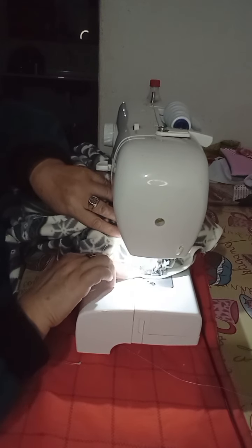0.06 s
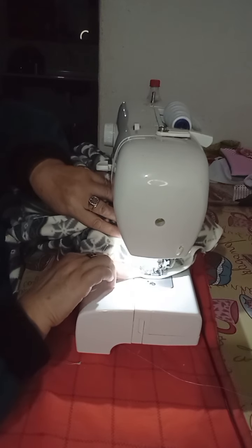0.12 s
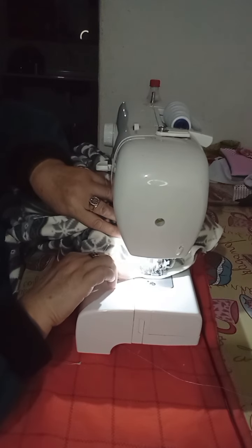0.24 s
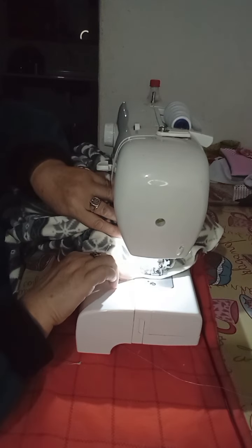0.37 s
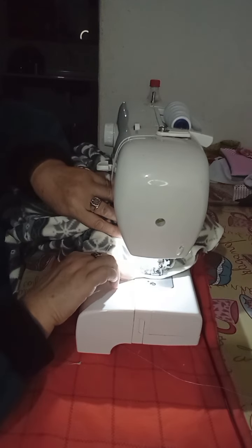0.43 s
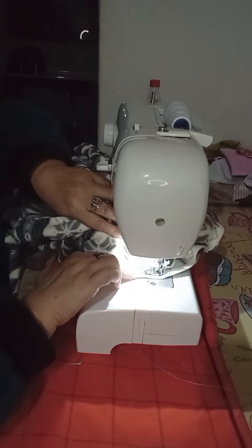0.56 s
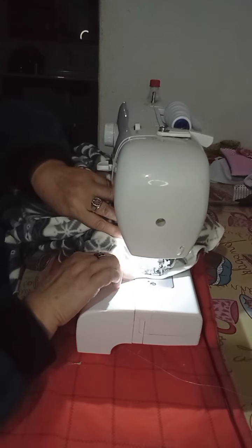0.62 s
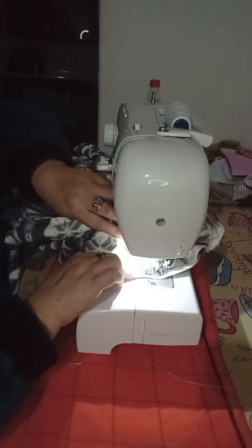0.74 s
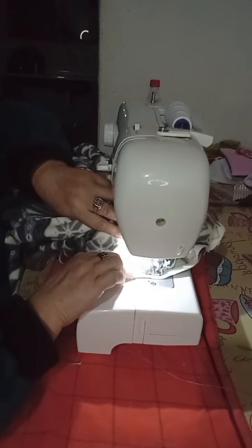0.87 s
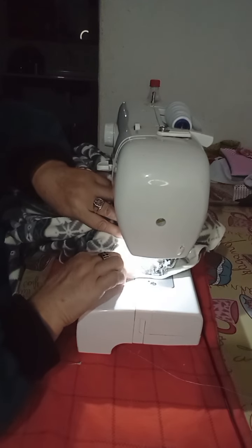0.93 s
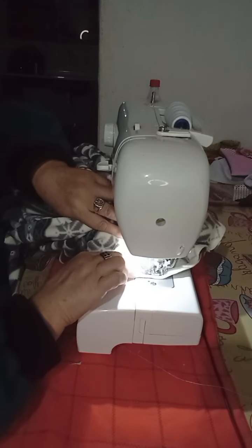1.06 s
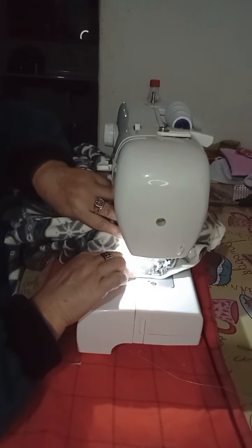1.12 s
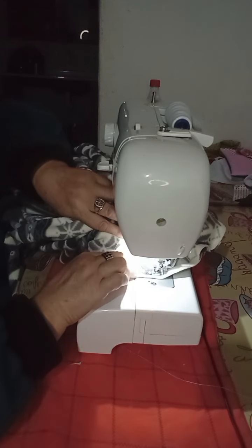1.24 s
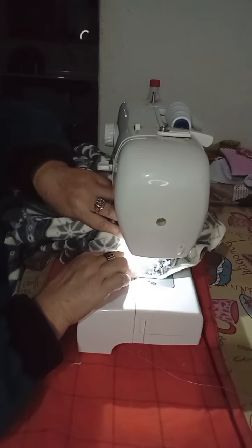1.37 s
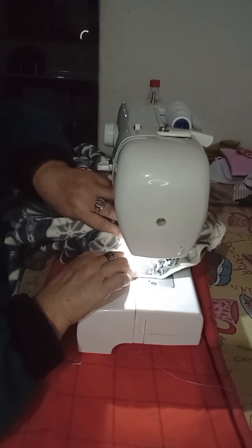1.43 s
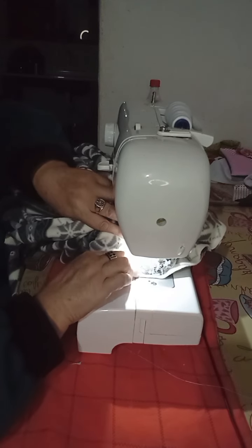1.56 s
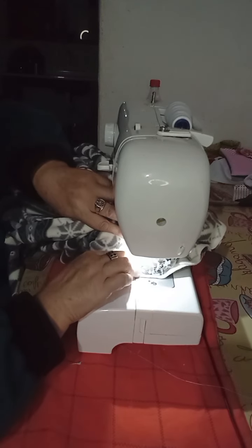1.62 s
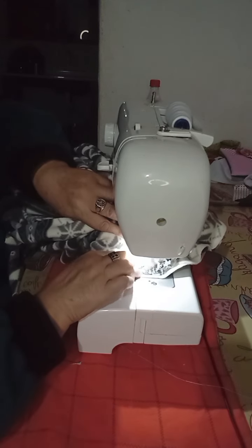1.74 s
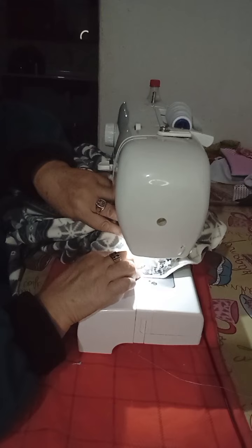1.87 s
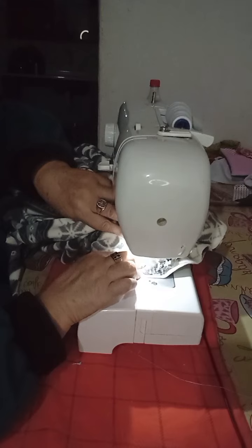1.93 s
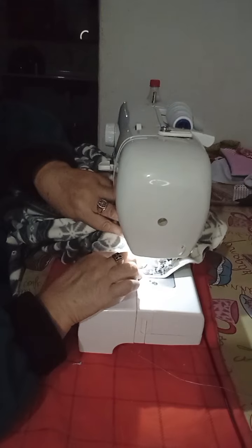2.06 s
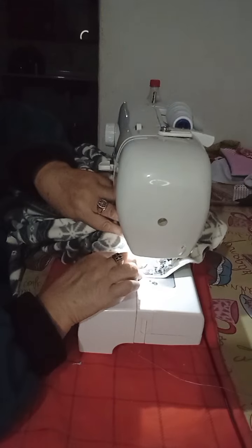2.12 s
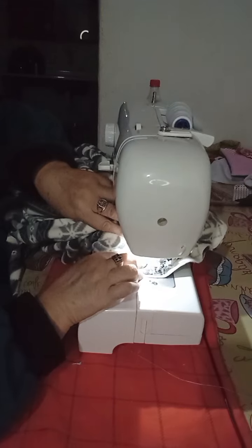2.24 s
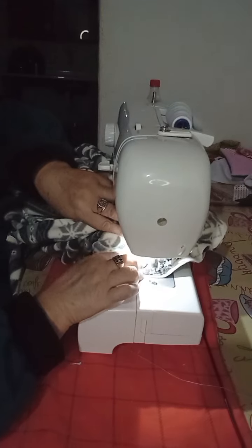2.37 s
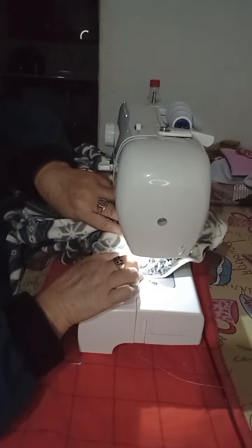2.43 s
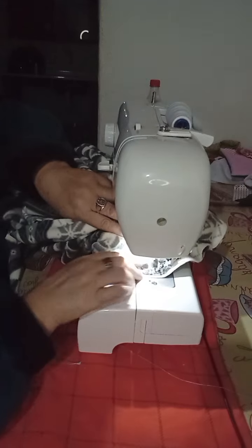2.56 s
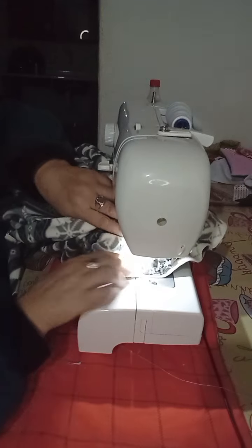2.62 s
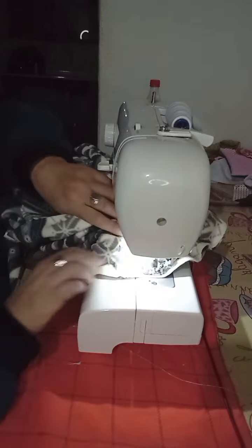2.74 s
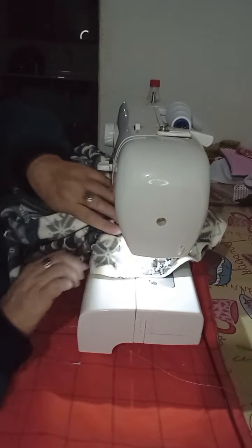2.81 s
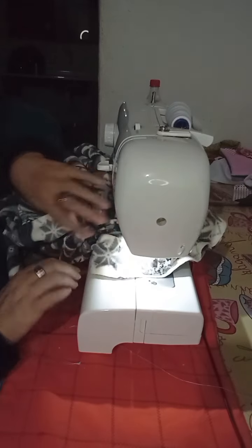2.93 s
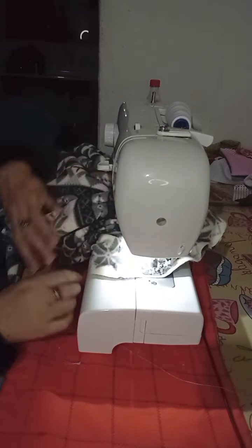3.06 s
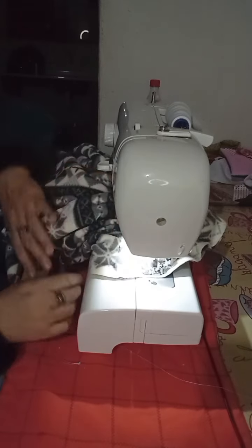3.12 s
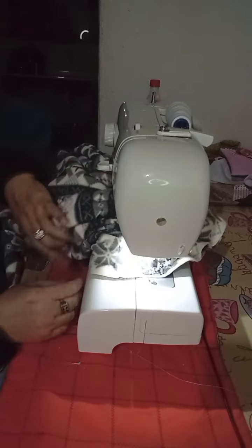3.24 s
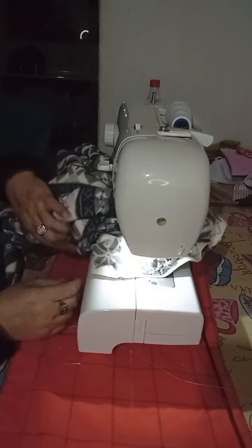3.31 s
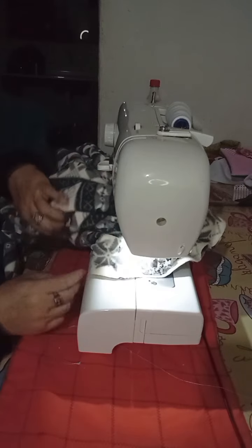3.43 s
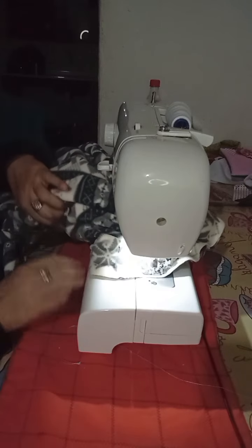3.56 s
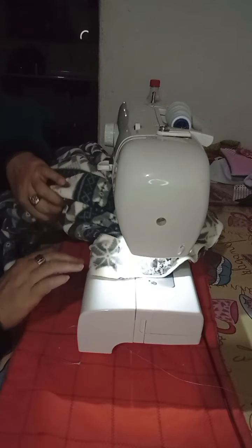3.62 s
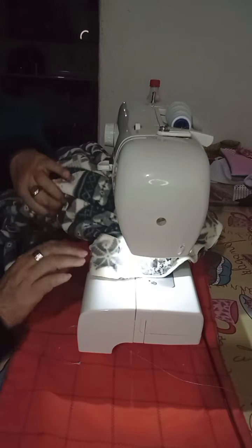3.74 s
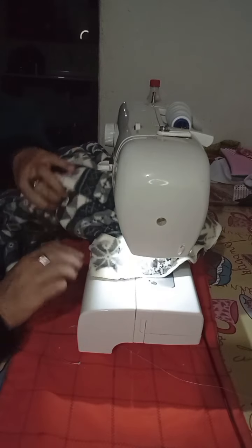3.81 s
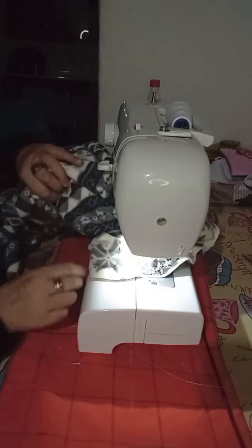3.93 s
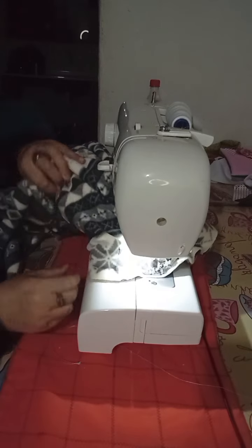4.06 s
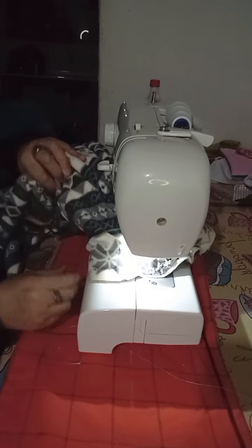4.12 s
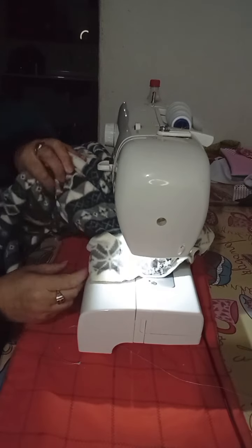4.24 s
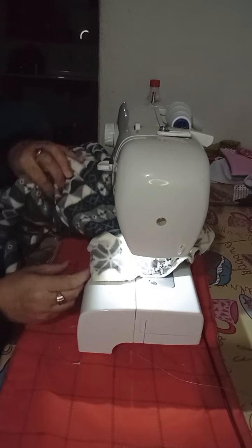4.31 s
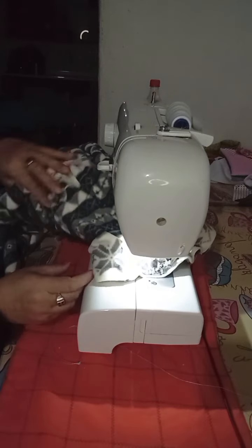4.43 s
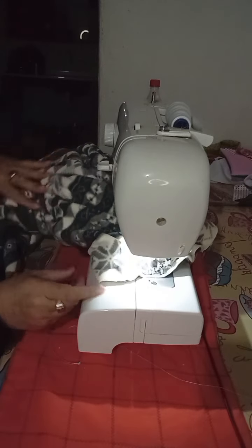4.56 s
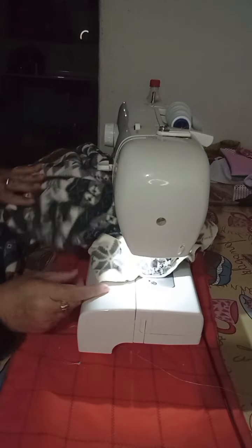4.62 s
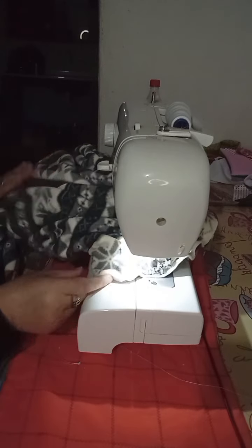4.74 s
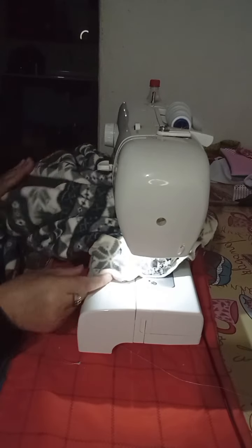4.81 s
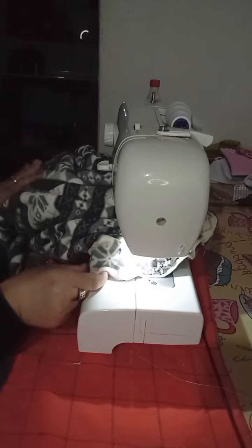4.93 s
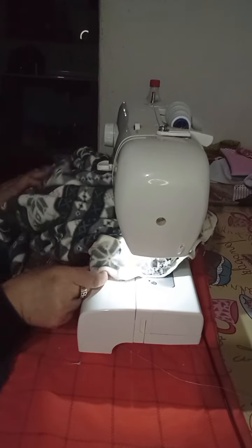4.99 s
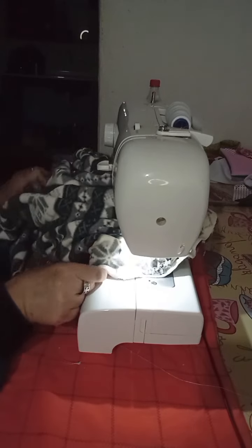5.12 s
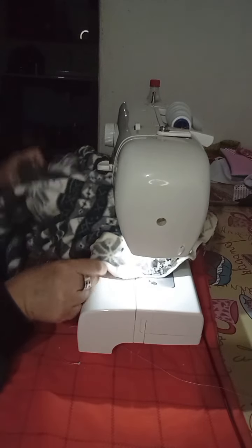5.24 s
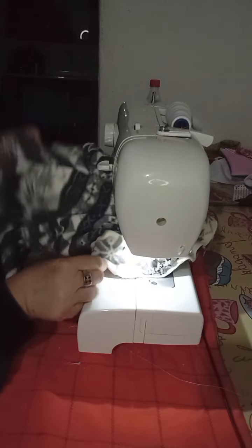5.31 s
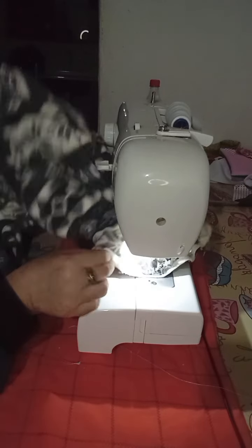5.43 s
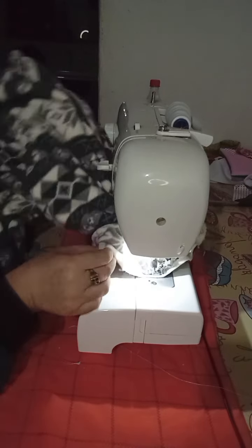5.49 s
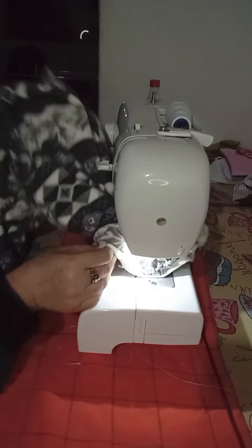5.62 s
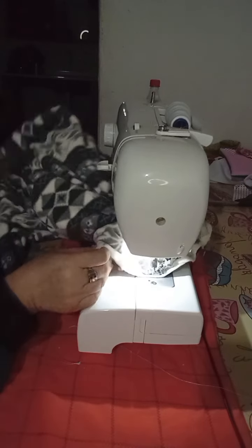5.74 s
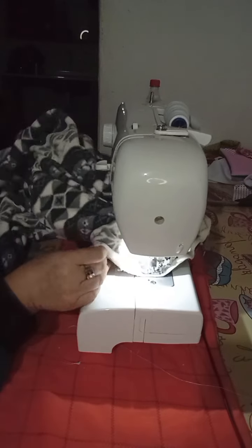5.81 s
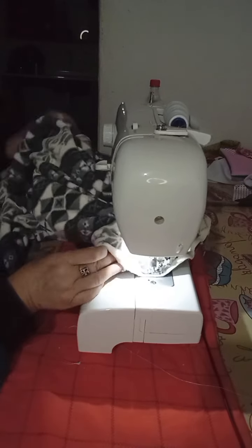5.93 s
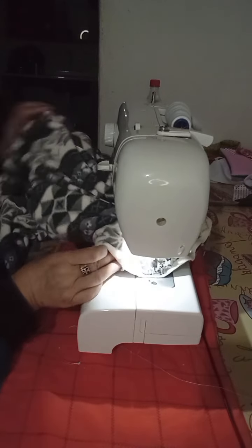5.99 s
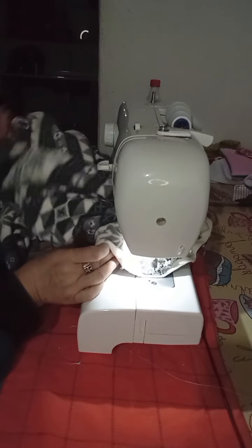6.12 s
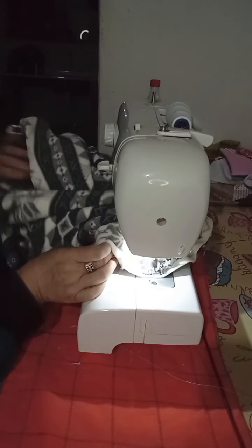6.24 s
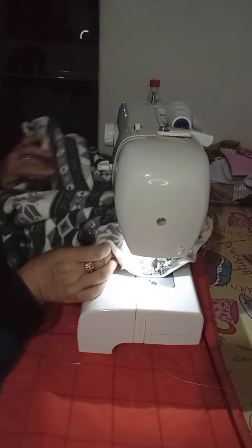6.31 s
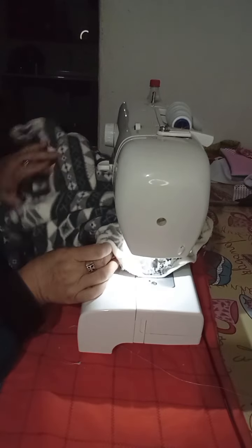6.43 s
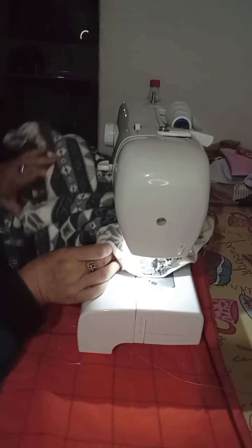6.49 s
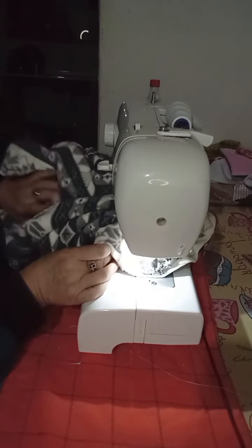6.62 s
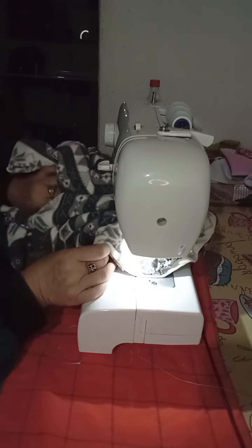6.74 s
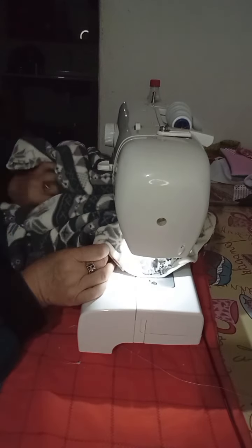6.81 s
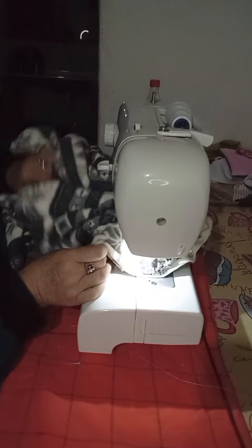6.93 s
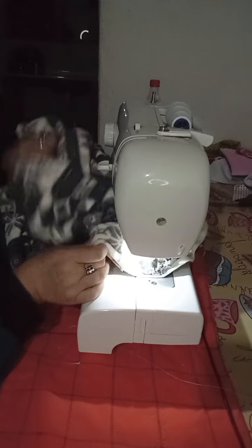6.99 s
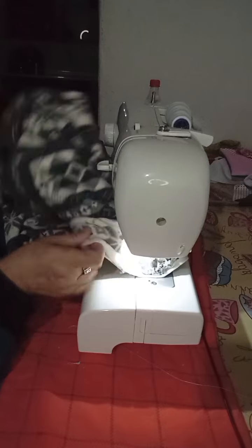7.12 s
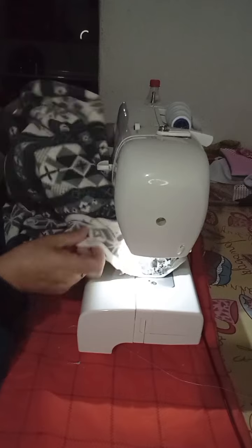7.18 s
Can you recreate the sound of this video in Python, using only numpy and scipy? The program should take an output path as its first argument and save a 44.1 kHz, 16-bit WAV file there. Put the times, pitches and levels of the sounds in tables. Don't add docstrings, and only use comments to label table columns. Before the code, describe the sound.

A small electric sewing machine stitches hard and fast, already running, then coasts down with a rattle and stops; quiet cloth rustle and light knocks follow.

```python
import sys
import numpy as np
from scipy import signal
from scipy.fft import rfft, irfft, next_fast_len
from scipy.io import wavfile

SR = 44100
rng = np.random.default_rng(int(sys.argv[2]) if len(sys.argv) > 2 else 0)


def undo_db(level):
    steps = np.asarray(level, float) / 20
    return 10 ** steps


def wav_out(sig):
    wavfile.write(sys.argv[1], SR, np.round(np.clip(np.atleast_2d(sig).T, -1, 1) * 32767).astype(np.int16))


N = 320166
RUN_IN = 8820
TIME = (np.arange(N + RUN_IN) - RUN_IN) / SR

FIRST_STITCH_S, TURNS_PER_S, GAIN_PER_S2 = .0603, 12.486, .0372
PEDAL_UP_S, COAST_S, TURN_COUNT = 2.145, .385, 30

# frequency in Hz, level in dB per Hz.
ROOM_COLOUR = [(42, -40.5), (72, 0), (142, -7.5), (191, -1), (309, -5), (338, 0), (370, -5), (820, -18.5),
               (1820, -25), (6200, -41.5), (8000, -49.5), (10500, -38.5), (12500, -49.5), (16500, -56)]


def rms_one(x):
    return x / np.sqrt(np.mean(x ** 2) + 1e-20)


def at_hz(points, hz):
    table_hz, values = np.array(points)[:, 0], np.array(points)[:, 1]
    return np.interp(np.log(hz + 1), np.log(table_hz), values)


def coloured(spectrum):
    size = next_fast_len(len(TIME))
    hz = np.fft.rfftfreq(size, 1 / SR)
    white = rfft(rng.standard_normal(size))
    return rms_one(irfft(white * undo_db(at_hz(spectrum, hz)), size)[:len(TIME)])


def band(x, low_hz, high_hz):
    return signal.sosfilt(signal.butter(2, [low_hz, high_hz], "band", fs=SR, output="sos"), x)


def drift(rate):
    count = int(TIME[-1] * rate) + 4
    return np.interp(TIME, np.linspace(TIME[0], TIME[-1], count), rng.standard_normal(count))


def train(s, sizes):
    clicks = np.full(len(TIME), 1e-18)
    places = np.round(np.ravel(s) * SR).astype(int) + RUN_IN
    np.add.at(clicks, np.clip(places, 0, len(TIME) - 1), np.ravel(sizes))
    return clicks


def ring(clicks, hz, t60):
    r, w = undo_db(-60 / (t60 * SR)), 2 * np.pi * hz / SR
    return signal.lfilter([0, np.sin(w)], [1, -2 * r * np.cos(w), r * r], clicks)


def fade(clicks, t60):
    return signal.lfilter([1], [1, -undo_db(-60 / (t60 * SR))], clicks)


def speed_db(s):
    return -20 / np.log(10) * np.clip(s - PEDAL_UP_S, 0, None) / COAST_S


def halted_db(s, halt_s=2.61, db_per_s=118.5):
    return -db_per_s * np.clip(s - halt_s, 0, None)


def turns():
    # time in seconds, peak level in dB.
    load = [
        (0, -6.5),
        (1.2, -6.5),
        (2.1, -7.5),
    ]
    powered = np.minimum(TIME, PEDAL_UP_S) - FIRST_STITCH_S
    angle = TURNS_PER_S * powered + GAIN_PER_S2 * powered ** 2 / 2
    top_speed = TURNS_PER_S + GAIN_PER_S2 * (PEDAL_UP_S - FIRST_STITCH_S)
    angle = angle + top_speed * COAST_S * (1 - undo_db(speed_db(TIME)))
    s = np.interp(np.arange(-3, TURN_COUNT), angle, TIME)
    s[0] = 2 * s[1] - s[2]
    turn = np.diff(s)
    force_power = 1.3
    db = np.interp(s, *np.transpose(load)) + force_power * speed_db(s)
    return s, db, np.r_[turn, turn[-1]]


def room_tone():
    tone = undo_db(-56) * coloured(ROOM_COLOUR)
    low = signal.sosfilt(signal.butter(2, 900, fs=SR, output="sos"), tone)
    return undo_db(-5.5) * low + undo_db(-3.0) * band(tone, 630, 16000)


def cloth_rustle():
    # time in seconds, level of the moving cloth in dB.
    movement = [
        (2.8, -74),
        (3.4, -78),
        (3.6, -82.5),
        (4.45, -85),
        (4.65, -75),
        (5.15, -80),
        (5.45, -78.5),
        (5.8, -82.5),
        (7.1, -82.5),
        (7.26, -76.5),
    ]
    cloth_db = np.interp(TIME, *np.transpose(movement))
    grain = undo_db(1.5 * drift(40))
    rustle = undo_db(cloth_db + 2.5) * rms_one(band(coloured(ROOM_COLOUR), 4000, 15000))
    airy_level = undo_db(cloth_db - 9.0 + 3.0 * drift(5))
    rustle += airy_level * rms_one(band(rng.standard_normal(len(TIME)), 11500, 15500))
    body_db = -63.5 + 0.3 * (cloth_db - cloth_db.mean())
    rustle += undo_db(body_db) * rms_one(band(coloured(ROOM_COLOUR), 500, 3500))
    return grain * rustle


def distant_hum():
    # frequency in Hz, level in dB rms.
    hum_lines = [(48.4, -64.5), (146, -73), (193.8, -68), (243, -73), (301.5, -74), (339.1, -73)]
    hum = 0
    for hz, db in hum_lines:
        waver_db = 2.5 * min(hz / 200, 1) * drift(3.5)
        hum = hum + undo_db(db + 3 + waver_db) * np.sin(2 * np.pi * hz * TIME)
    return hum


def knocks(white):
    # time in seconds, peak level in dB, hardness in dB, brightness in dB.
    rattles = [
        (2.226, -13, -7, -14),
        (2.245, -13.5, -14, -18),
        (2.31, -20.5, -19, -34),
        (2.337, -15, -3, -28),
        (2.454, -26.5, -12, -18),
        (2.503, -19, -8.5, -24.5),
        (2.532, -22.5, -14, -22),
        (2.552, -25, -5, -13),
        (2.669, -41, -15, -17),
        (2.732, -40.5, -24, -45),
    ]
    # time in seconds, peak level in dB, hardness in dB, brightness in dB.
    handling = [(3.28, -49, -8.5, -21), (3.298, -49.5, -12, -18), (3.588, -41.5, -0.5, -26),
                (3.624, -46, -14, -19.5), (3.751, -67.5, -13, -1), (3.839, -55, -9.5, -15.5),
                (3.925, -42, -9.5, -32), (3.998, -37.5, -11.5, -14.5), (4.02, -53, -17, -3),
                (4.079, -67, -14, 0.5), (4.159, -62.5, -9.5, -1.5), (4.314, -44.5, -4.5, -16),
                (4.349, -45.5, -2, -10.5), (5.181, -62.5, -19, -7), (4.791, -46, -7, -27.5),
                (5.396, -45, -18.5, -34), (5.46, -48, -4, -9), (5.534, -59, -22, -25),
                (5.998, -42, 1.5, -18.5), (6.027, -47.5, -15, -24), (6.153, -45.5, -17, -29),
                (6.181, -31.5, -4, -12), (6.257, -61, -13, -2.5), (6.404, -46, -24, -38.5),
                (6.519, -33.5, -4.5, -14.5), (6.836, -56.5, -4.5, -11), (7.029, -52, -17, -29)]
    out = np.zeros(len(TIME))
    ranges_hz = ((550, 1600), (1700, 3500), (3700, 7800), (8200, 12500))
    middle, upper, treble, top = (rms_one(band(band(white, *hz), *hz)) for hz in ranges_hz)
    t = np.arange(SR // 5) / SR
    dying, crack = undo_db(-60 * t / .055), undo_db(3 - 60 * t / .005)
    touch = band(1. * (t == 0), 1200, 4600)
    for s, db, hard_db, bright_db in [*rattles, *handling]:
        start = RUN_IN + round(s * SR)
        span = slice(start, start + len(t))
        burst = (undo_db(-8.0) * middle[span] + undo_db(hard_db - 10.0) * upper[span]) * (dying + crack / 2)
        burst = burst + undo_db(4 + hard_db) * touch
        bright = undo_db(-8.5) * treble[span] + undo_db(-12.0) * top[span]
        burst = burst + undo_db(bright_db) * bright * (dying + crack)
        out[span] += undo_db(db) * burst
    return out


def thread_swish(white):
    hiss = rms_one(band(white, 12500, 16500))
    return undo_db(-60) * hiss * fade(train(3.996, 1.0), t60=.2)


def board_blows():
    # time in seconds, peak level in dB.
    bumps = [
        (5.395, -41.5),
        (5.535, -48.5),
        (6.18, -29),
        (6.405, -39.5),
        (6.52, -30),
    ]
    # frequency in Hz, level in dB, t60 in seconds.
    board = [(206.3, -32, 0.073), (301, -15, 0.2), (600, -17, 0.04), (760, -6, .022), (900, 0, 0.024),
             (1100, -7, 0.025), (1400, -10, 0.03), (2800, -11, .018)]
    out = 0
    s, db = np.transpose(bumps)
    s = s[:, None] + rng.uniform(.7, 1.3, (len(s), 4)) * [0, .004, .011, .017]
    rebound_db = -4.5 * np.arange(4)
    for hz, level_db, t60 in board:
        sizes = undo_db(db[:, None] + level_db - 4.0 + rebound_db + 1.5 * rng.standard_normal(s.shape))
        clicks = train(s, sizes * rng.choice([-1, 1], s.shape))
        out = out + band(ring(clicks, hz, t60), hz / 2, hz * 2)
    return out


def clinks():
    # time in seconds, frequency in Hz, level in dB, t60 in seconds.
    loose_parts = [(3.586, 1770, -38, 0.018), (3.588, 3000, -55, 0.06), (4.314, 410, -44, 0.09),
                   (2.322, 1560, -26, 0.1), (2.338, 4500, -34, .04), (2.228, 100, -31, .14),
                   (2.36, 190, -33, .1), (2.342, 720, -21, .09), (2.505, 330, -30, .07),
                   (2.64, 345, -52, .3), (2.34, 560, -27, .05), (2.5, 10700, -44, .03)]
    out = 0
    for s, hz, db, t60 in loose_parts:
        out = out + band(ring(train(s, undo_db(db)), hz, t60), hz / 2, hz * 2)
    return out


def shake():
    # multiple of the turn rate, level in dB rms.
    shaft_lines = [(6, -55.5), (7, -62), (8, -53), (9, -51), (10, -59.5), (11, -52), (12, -42), (13, -48.5),
                   (14, -47), (15, -44.5), (16, -48.5), (17, -38), (18, -45.5), (19, -44.5), (20, -61.5),
                   (21, -61), (22, -60.5), (23, -60)]
    s, db, turn = turns()
    angle = np.interp(TIME, np.r_[s, s[-1] + 2 * turn[-1]], np.arange(len(s) + 1))
    lines = 0
    for k, level_db in shaft_lines:
        cycles = round(k) * (angle - .42) + 0.088 * rng.standard_normal()
        lines = lines + undo_db(level_db + 2.0) * np.cos(2 * np.pi * cycles)
    speed_power = 2.5
    return undo_db(-1.8 + speed_power * speed_db(TIME) + halted_db(TIME)) * lines


def whirr():
    # frequency in Hz, level in dB per Hz.
    motor_colour = [(65, -49), (110, -12.5), (275, -18), (564, -5.5), (1020, -5.5), (1310, -5.5),
                    (1830, -6), (2110, -6.5), (2960, -9.5), (5780, -25), (7600, -30), (10800, -23.5),
                    (15200, -41), (16500, -47)]
    s, db, turn = turns()
    teeth = coloured(motor_colour)[:7000] * np.hanning(7000)
    repeated = signal.fftconvolve(train(s, np.ones(len(s))), teeth)[:len(TIME)]
    fresh = undo_db(-3.0 + 4 * drift(60)) * coloured(motor_colour)
    start_db, sag_db_per_s, speed_power = -29.5, 0.36, 1.62
    level_db = start_db - sag_db_per_s * TIME + speed_power * speed_db(TIME) + halted_db(TIME)
    return undo_db(level_db) * (undo_db(-10.0) * band(repeated, 1200, 15000) + undo_db(-10.5) * repeated + fresh)


def struck_part(modes, contact_db, bass_hz, soft_hz, loose_db, when, force):
    part, count = 0, force.shape[1]
    for hz, level_db, t60 in modes:
        coupling = rng.choice([-1, 1], count) * undo_db(contact_db + 1.5 * rng.standard_normal(count))
        sizes = force * coupling * undo_db(level_db + loose_db * rng.standard_normal(force.shape))
        part = part + ring(train(when, sizes), hz, t60)
    return band(band(part, bass_hz, soft_hz), bass_hz, 11000)


def metal_ticks(at, ticks, pattern):
    t = np.arange(4000) / SR
    dull = band(pattern, 350, 4500)
    bright = pattern - dull
    dying = undo_db(-60 * t / .02) + undo_db(-9.0 - 60 * t / .12)
    quick = undo_db(-5.0 - 60 * t / .012) + undo_db(-13.0 - 60 * t / .12)
    out = 0
    for k in range(at.shape[1]):
        tick = dull[4000 * k:][:4000] * dying + bright[4000 * k:][:4000] * quick
        out = out + signal.fftconvolve(train(at[:, k], ticks[:, k]), tick)[:len(TIME)]
    return out


def thread_snaps(s, turn, force, pattern):
    # share of the turn, level in dB.
    snaps = [
        (-.08, -19),
        (-.022, -9),
        (-.004, 0),
        (.012, -3),
        (.445, -11),
        (.462, -7),
    ]
    slope = np.diff(pattern)
    thin = rms_one(band(slope, 4500, 16000) + 1.5 * band(slope, 9800, 11800))
    t = np.arange(2000) / SR
    out = 0
    for k, (share, db) in enumerate(snaps):
        snap = thin[-4000 * (k + 1):][:2000] * undo_db(-18 + db - 60 * t / 0.019)
        out = out + signal.fftconvolve(train(s + turn * share, force[:, k]), snap)[:len(TIME)]
    return out


def stitching(slack_s, uneven_db):
    # share of the turn, then levels in dB of thud, housing, metal and tick.
    contacts = [(-.03, -30, -14, -20, -12), (0, -14, -3, -7, -2), (.02, -8, -3, -3, -3),
                (.05, -5, -4, -5, -12), (.08, -9, -4, -10, -19), (.115, -9, -9, -13, -16),
                (.16, -5, -18, -13, -20), (.2, -4, -16, -14, -10), (.28, -9, -14, -18, -20),
                (.35, -18, -15, -17, -19), (.455, -18, -13, -7, -8), (.485, -8, -7, -8, -11),
                (.53, -12, -14, -10, -15), (.59, -11, -11, -15, -22), (.7, -13, -15, -18, -28),
                (.78, -17, -16, -21, -28)]
    # frequency in Hz, level in dB, t60 in seconds.
    bed = [(305, -21.5, 0.15), (324, -12, 0.13), (396.3, -24.5, 0.45), (430.8, -17, 0.093),
           (463, -27.5, 0.14)]
    # frequency in Hz, level in dB, t60 in seconds.
    panels = [(506, -22, 0.034), (602, -24.5, 0.11), (659, -16.5, 0.047), (710, -14, .04),
              (782, -13, 0.043), (858, -16.5, 0.045)]
    # frequency in Hz, level in dB, t60 in seconds.
    housing = [(996, -11, 0.06), (1046, -8.5, 0.05), (1125, -15, 0.045)]
    # frequency in Hz, level in dB, t60 in seconds.
    metal = [(1418, -20, 0.07), (1775, -13, 0.045), (1880, -11, 0.03), (1990, -14, .035), (2470, -10, .045),
             (2890, -12.5, 0.055), (3473, -14, 0.029), (3820, -10.5, 0.024), (4840, -16.5, 0.024),
             (5880, -13, 0.017), (6510, -18.5, 0.017)]
    # frequency in Hz, level in dB per Hz.
    tick_colour = [(710, -31), (1200, -10.5), (1530, -6), (1820, 6), (2120, -17), (2980, 0), (3400, -7.5),
                   (5330, -9), (5820, -5), (7660, -20.5), (10800, -10.5), (15300, -29), (16500, -42.5)]
    s, db, turn = turns()
    share, thud_db, housing_db, metal_db, tick_db = np.transpose(contacts)
    shape = (len(s), len(share))
    due, play = s[:, None] + turn[:, None] * share, slack_s * rng.standard_normal(shape)
    at = due + play
    loose_at = due + 4 * play
    next_db = np.r_[db[1:], db[-1] - 25.0]
    slowness = np.clip(turn / turn[0] - 1, 0, 1)[:, None] ** 2
    slowing = slowness * np.sqrt(np.clip(share, 0, 1)) * (next_db - db)[:, None] * 4.0
    force = undo_db(db[:, None] + slowing + uneven_db * rng.standard_normal(shape))
    bed_db = thud_db + 1.5 * speed_db(s)[:, None]
    out = struck_part(bed, bed_db, 285, 700, 1.8, at, force)
    out = out + struck_part(panels, housing_db + 1.0, 180, 1800, 2.2, loose_at, force)
    out = out + struck_part(housing, housing_db, 180, 1800, 1.5, at, force)
    out = out + struck_part(metal, metal_db - 4.5, 180, 9000, 1.2, at, force)
    ticks = force * undo_db(tick_db - 11.0)
    pattern = coloured(tick_colour)
    out = out + metal_ticks(at, ticks, pattern) + thread_snaps(s, turn, force, pattern)
    fresh_rattle = coloured(tick_colour) * fade(train(at, ticks), t60=0.07)
    return out + undo_db(-11) * fresh_rattle


def room(x):
    # frequency in Hz, t60 in seconds.
    decay = [(150, .42), (500, .4), (2000, .32), (6000, .24), (14000, .14)]
    t, tail = np.arange(SR // 2) / SR, 0
    white = rng.standard_normal((2, len(t)))
    for k, low in enumerate(70 * 2. ** np.arange(8)):
        tail = tail + band(white[k % 2], low, 2 * low) * undo_db(-60 * t / at_hz(decay, 1.4 * low))
    near_walls = 1 + .4 * np.clip((.07 - t) / .02, 0, 1)
    tail = tail * np.clip((t - .003) / .008, 0, 1) * near_walls
    return signal.fftconvolve(x, tail / np.sqrt(np.sum(tail ** 2)))[:len(x)]


def scene():
    machine = stitching(slack_s=.00005, uneven_db=1.4)
    white = rng.standard_normal(len(TIME))
    hands = knocks(white) + thread_swish(white) + board_blows() + clinks()
    wet = room(undo_db(-14.0) * machine + undo_db(-7.5) * hands)
    running = shake() + whirr()
    background = room_tone() + cloth_rustle() + distant_hum()
    return (machine + hands + wet + running + background)[None, RUN_IN:]


def band_limit(x):
    return signal.sosfilt(signal.butter(12, 16810, fs=SR, output="sos"), x)


def record(dry):
    rounded = .7 * np.tanh(dry / .7)
    cut = signal.sosfilt(signal.cheby2(10, 50, 17100, fs=SR, output="sos"), rounded)
    return band_limit(cut)


dry = scene()
out = record(dry)
wav_out(out)
```